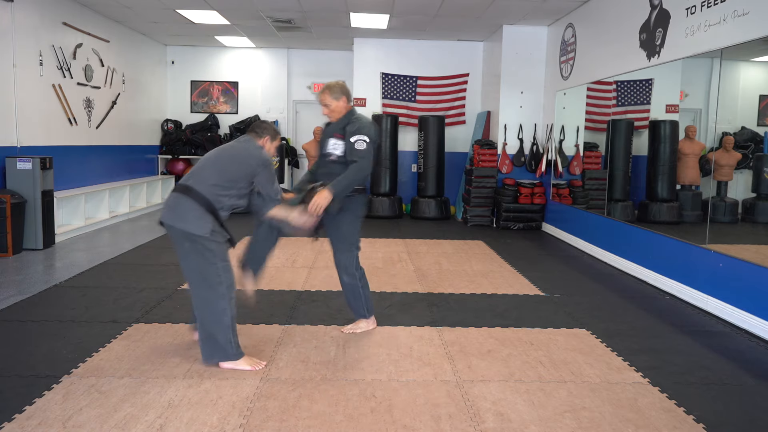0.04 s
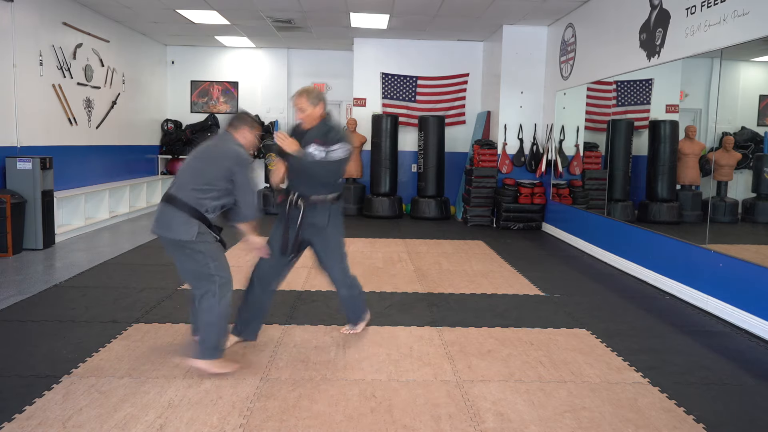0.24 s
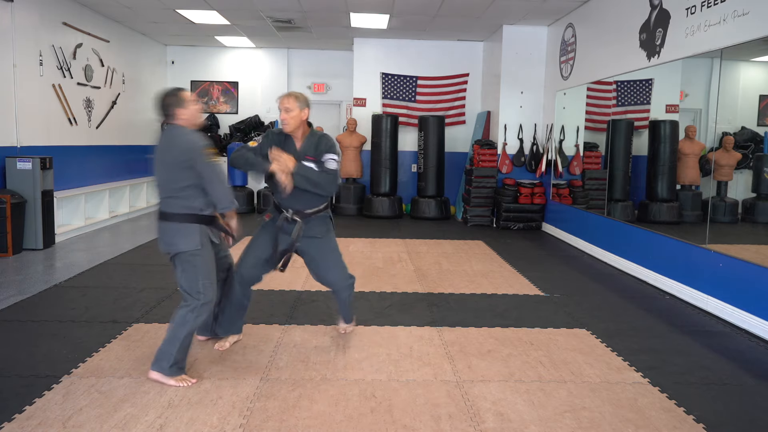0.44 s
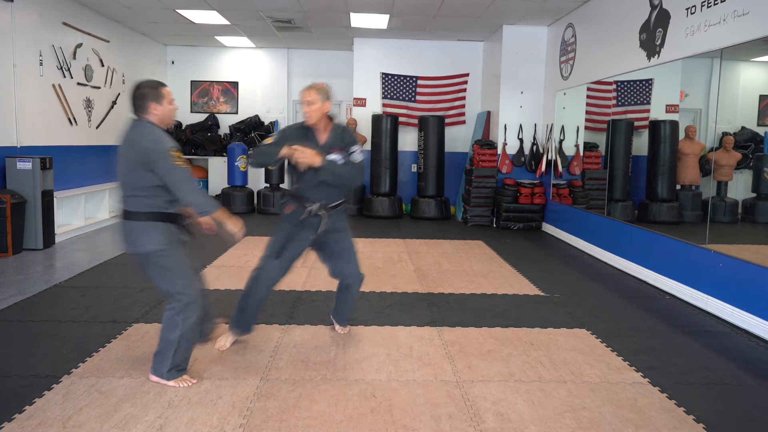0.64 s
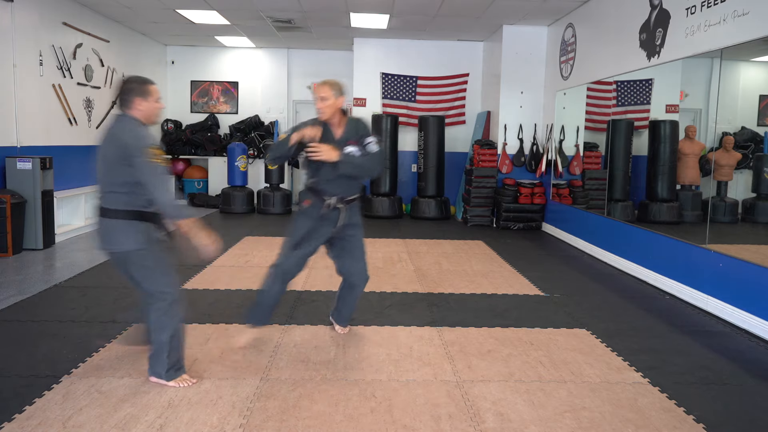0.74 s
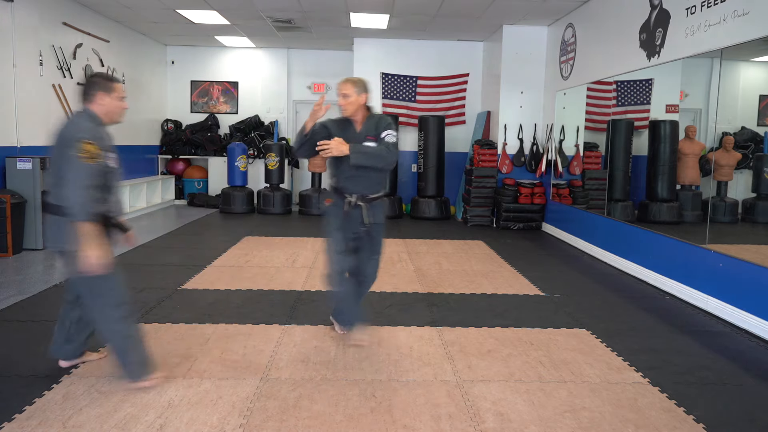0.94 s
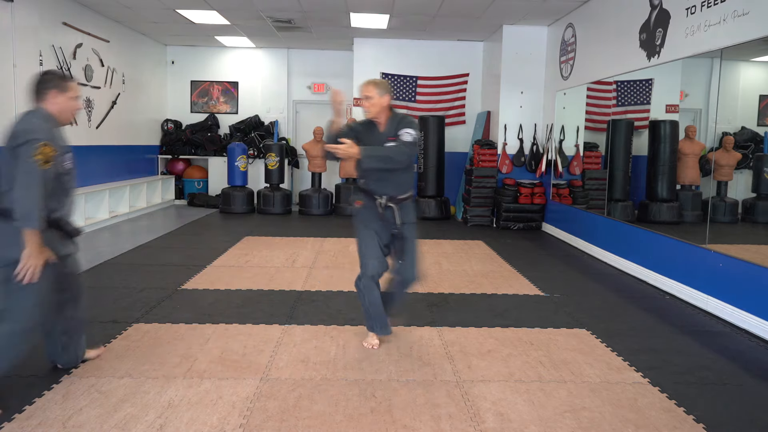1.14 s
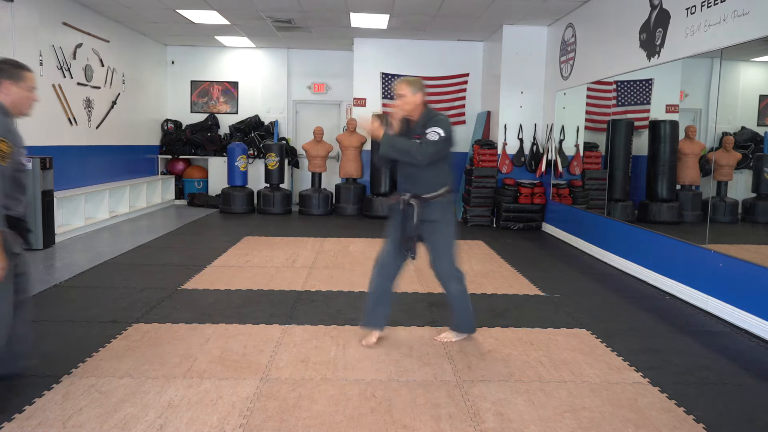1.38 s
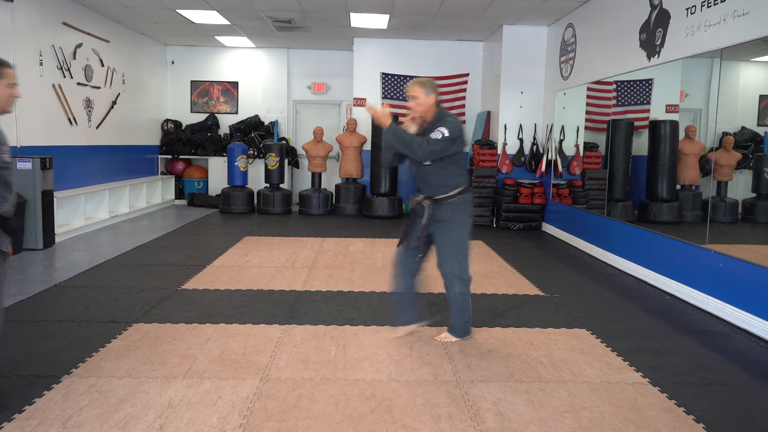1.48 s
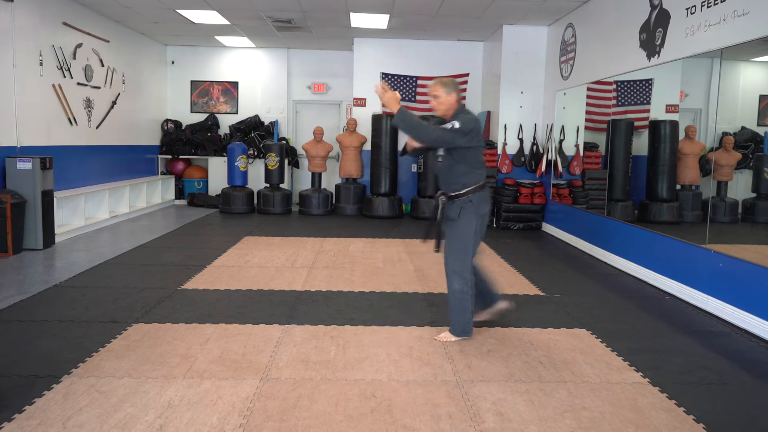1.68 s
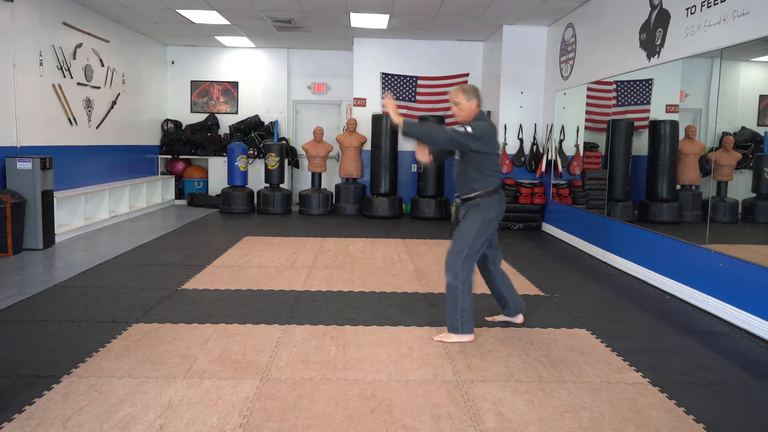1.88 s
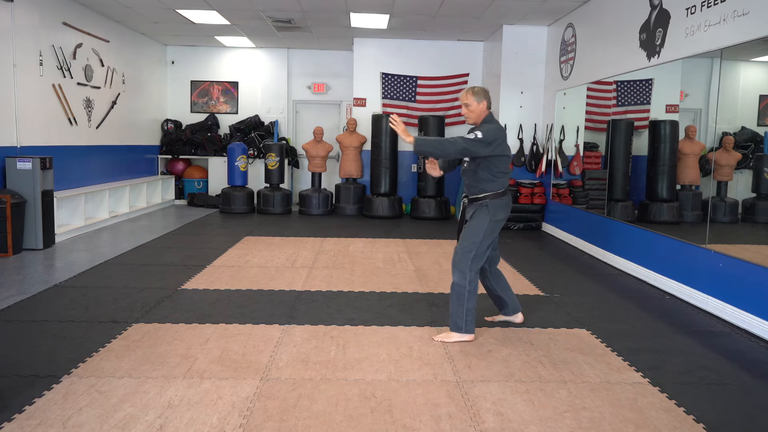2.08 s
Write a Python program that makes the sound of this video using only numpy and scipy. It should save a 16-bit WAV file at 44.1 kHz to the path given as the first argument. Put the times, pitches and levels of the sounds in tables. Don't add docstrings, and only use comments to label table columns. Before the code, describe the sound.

Sparring slaps and uniform snaps on a foam mat. Soft cloth rustle opens; at 0.3-0.4 s a dense flurry of dull body slaps, a low thud and sharp canvas cracks, with lighter contacts to 0.5. A slap and swish come at 0.95, then a bright snap and slaps at 1.13-1.27, left. Light swishes and faint steps follow until about 1.9, over steady ventilation and short hall reflections.

```python
import sys
import numpy as np
from scipy import signal
from scipy.fft import rfft, irfft
from scipy.io import wavfile
from scipy.ndimage import uniform_filter1d, map_coordinates

SR = 44100
rng = np.random.default_rng(int(sys.argv[2]) if len(sys.argv) > 2 else 0)


def decibels_to_gain(level_db):
    exponent = np.asarray(level_db, float) / 20
    return 10 ** exponent


def output_pcm(signal):
    pcm = np.clip(np.atleast_2d(signal).T, -1, 1) * 32767
    wavfile.write(sys.argv[1], SR, np.round(pcm).astype(np.int16))


N = 93536


def rms_one(x):
    return x / np.sqrt(np.mean(x ** 2) + 1e-20)


def at_hz(points, hz):
    curve = np.array(points)
    return np.interp(np.log(hz), np.log(curve[:, 0]), curve[:, 1])


def resonate(x, hz, width_hz):
    r = np.exp(-np.pi * width_hz / SR)
    gain = (1 - r * r) / 2
    return signal.lfilter([gain, 0, -gain], [1, -2 * r * np.cos(2 * np.pi * hz / SR), r * r], x)


def coloured(x, spectrum):
    hz = np.maximum(np.arange(len(x) // 2 + 1) * SR / len(x), 1)
    return rms_one(irfft(rfft(x) * decibels_to_gain(at_hz(spectrum, hz)), len(x)))


def smoothed_noise(size, smooth):
    noise = rng.standard_normal(size)
    return rms_one(uniform_filter1d(uniform_filter1d(noise, size=smooth), size=smooth))


def grains(spread_db, smooth):
    lumps = smoothed_noise(N, smooth)
    return rms_one(rng.standard_normal(N) * decibels_to_gain(spread_db * lumps))


def diffuse(size, shape):
    # hz, side_minus_mid_db
    width_curve = [(60, -64), (250, -19), (500, -10), (1000, -2), (2500, 5), (6000, 0.5), (14000, -2.5)]
    out = 0
    edges = 22 * 2 ** np.arange(0, 9.6, .5)
    white = rng.standard_normal((2, 2, size))
    for k, (low, high) in enumerate(zip(edges, edges[1:])):
        band = signal.butter(2, [low, high], "band", fs=SR, output="sos")
        mid, side = signal.sosfilt(band, white[k % 2])
        hz = np.sqrt(low * high)
        wide = decibels_to_gain(at_hz(width_curve, hz))
        stereo = mid + wide * side * np.array([[1], [-1]])
        out = out + shape(hz) * stereo / np.sqrt(1 + wide ** 2)
    return out


def burst(start, length):
    t = np.arange(N) / SR - start
    onset = np.clip(t / (0.034 * length), 0, 1)
    sag = np.clip(t, 0, length) / length * .5
    release = np.clip(t - length, 0, 1) / (.45 * length)
    return onset * np.exp(-sag - release)


def struck(push, shape, db, hz, width_hz):
    first = resonate(push + 1e-18, hz, width_hz)
    body = resonate(first, hz, max(width_hz, hz * .65))
    return decibels_to_gain(db) * body / np.sqrt(np.sum(body ** 2) / np.sum(shape ** 2) + 1e-20)


def ventilation():
    # hz, level_db
    air_curve = [(15, -29), (25, -13.5), (141, -0.5), (317, -9), (1070, -17), (1230, -31), (1440, -23.5),
                 (7710, -26), (16000, -41)]
    # pitch_hz, width_hz, level_db
    fan_tones = [
        (55.7, 9.4, -52),
        (119.9, 32, -47.5),
        (31, 5.1, -58.5),
    ]
    # time_s, level_db
    air_flow = [
        (0, 1.5),
        (.6, -0.5),
        (1.2, 1),
        (1.75, 0),
        (1.9, -1.5),
        (2.12, -1.5),
    ]
    settle = SR
    air = diffuse(N + settle, lambda hz: decibels_to_gain(at_hz(air_curve, hz)))[:, settle:]
    out = decibels_to_gain(-46.5) * rms_one(air)
    for noise, (hz, width_hz, db) in zip(rng.standard_normal((3, N + settle)), fan_tones):
        tone = resonate(resonate(noise, hz, width_hz), hz, width_hz)[settle:]
        power = uniform_filter1d(tone ** 2, size=2000)
        out = out + decibels_to_gain(db) * rms_one(tone / power ** .25)
    return decibels_to_gain(np.interp(np.arange(N) / SR, *np.transpose(air_flow))) * out


def swishes():
    # peak_s, level_db, rise_s, fall_s, lowest_hz
    swish_events = [(0.019, -39, 0.038, 0.04, 1830), (0.113, -36.5, 0.042, 0.04, 2720),
                    (0.28, -40.5, 0.059, 0.065, 4260), (0.43, -44.5, 0.018, 0.11, 4180),
                    (0.636, -48.5, 0.03, 0.019, 2430), (0.83, -37.5, 0.054, 0.089, 6150),
                    (0.94, -29.5, 0.023, 0.011, 4700), (1.06, -43.5, 0.094, 0.046, 5400),
                    (1.20, -48, 0.016, 0.11, 5030), (1.35, -38.5, 0.023, 0.019, 6900),
                    (1.39, -43, 0.034, 0.13, 2650), (1.515, -36, 0.029, 0.053, 5700),
                    (1.581, -31.5, 0.028, 0.023, 5000), (1.67, -37.5, 0.059, 0.063, 6100),
                    (1.81, -43.5, 0.045, 0.011, 5560), (1.899, -38.5, 0.071, 0.02, 3520)]
    # hz, level_db
    cloth_curve = [(1000, 7), (3000, -1.5), (6000, 1.5), (10000, 1.5), (14000, -3), (16000, -6.5)]
    out, t = np.zeros(N), np.arange(N) / SR
    hiss = coloured(grains(.7, smooth=150), cloth_curve)
    for s, db, rise, fall, hz in swish_events:
        bright = signal.sosfilt(signal.butter(3, hz, "high", fs=SR, output="sos"), hiss)
        swell = np.exp(-((t - s) / np.where(t < s, rise, fall)) ** 2)
        out += decibels_to_gain(db) * rms_one(bright + decibels_to_gain(-14.5) * hiss) * swell
    return out


def rings():
    # start_s, level_db, pitch_hz, length_s, width_hz
    ring_events = [(0.133, -42.5, 1475, 0.022, 80), (0.301, -29.5, 331.6, 0.028, 40),
                   (0.331, -25.5, 338.6, 0.048, 40), (0.409, -32, 345, 0.017, 60),
                   (0.433, -28, 455, 0.015, 120), (0.44, -34, 283, .016, 80), (0.483, -37, 345, 0.021, 60),
                   (0.508, -40.5, 321, .016, 60), (0.479, -40, 622, .045, 50),
                   (0.965, -39, 433, 0.015, 120), (1.036, -37.5, 347, 0.021, 70),
                   (1.066, -39, 371, .02, 70), (1.136, -28.5, 740, .014, 151), (1.185, -36, 352, .022, 80),
                   (0.992, -30.5, 484, 0.013, 140), (1.262, -38, 800, .02, 121),
                   (1.28, -40, 417, 0.022, 90), (1.114, -38, 2360, 0.0094, 700),
                   (1.123, -32, 2115, 0.0095, 600)]
    rough, t, out = rng.standard_normal(N), np.arange(N) / SR, 0
    for s, db, hz, length, width_hz in ring_events:
        shape = (t > s) * (t < s + length) * (0.79 + 0.36 * (t - s) / length)
        push = np.sin(2 * np.pi * hz * (t - s)) + .5 * rms_one(resonate(rough, hz, width_hz))
        out = out + struck(push * shape, shape, db, hz, width_hz)
    return out


def thuds():
    # peak_s, level_db, body_hz, half_length_s
    thud_events = [(0.022, -45, 290, 0.047), (0.084, -45, 1450, 0.19), (0.142, -39.5, 770, 0.028),
                   (0.323, -39, 175, 0.017), (0.36, -29, 200, 0.016), (0.47, -42, 155, 0.017),
                   (0.52, -44, 240, 0.0087), (0.77, -50.5, 1340, 0.0057), (0.69, -52, 900, 0.0081),
                   (0.974, -41.5, 396, 0.068), (0.97, -43, 185, 0.044), (1.04, -49, 4500, 0.035),
                   (1.32, -45.5, 316, 0.036), (1.401, -47, 1730, 0.028), (0.972, -42.5, 2960, 0.058),
                   (1.3, -60.5, 2300, 0.041), (1.14, -36, 228, 0.008), (1.51, -45.5, 3540, 0.029),
                   (1.76, -56, 3200, 0.049), (1.275, -43.5, 233, 0.014), (1.6, -48, 3300, 0.043),
                   (0.39, -47.5, 54, 0.037), (2.1, -53.5, 2700, 0.022), (1.148, -25.5, 3940, 0.015),
                   (0.607, -54, 2270, 0.069), (0.792, -54.5, 2900, 0.043), (1.887, -47, 2300, 0.05),
                   (0.2, -47.5, 203, 0.076), (0.45, -43, 590, 0.015), (1.4, -53, 56.7, 0.018)]
    push, t, out = grains(1.7, smooth=100), np.arange(N) / SR, 0
    for s, db, hz, half in thud_events:
        shape = np.exp(-((t - s) / half) ** 2)
        out = out + struck(push * shape, shape, db, hz, hz / 1.04)
    return out


def cracks():
    # start_s, level_db, length_s, highest_hz
    crack_events = [(0.311, -31.5, 0.014, 8000), (0.325, -31.5, 0.017, 11000), (0.337, -31, 0.0067, 12000),
                    (0.344, -29, 0.004, 14000), (0.3493, -23, 0.0055, 12000), (0.3528, -19, 0.0028, 18000),
                    (0.357, -23, 0.0037, 16000), (0.3616, -20.5, 0.002, 15000),
                    (0.3647, -21, 0.0037, 13000), (0.371, -29.5, 0.0064, 8000), (1.1045, -35, 0.001, 7000),
                    (1.1368, -17.5, 0.0022, 20000), (1.2562, -34, 0.001, 17000), (1.134, -23, 0.002, 10000),
                    (1.1421, -23, 0.0032, 8000), (1.1464, -18, 0.0048, 8900), (1.153, -23, 0.007, 9800),
                    (1.16, -30, 0.006, 6950), (1.182, -35.5, 0.004, 6060), (1.204, -32, 0.0036, 7870),
                    (1.329, -41, 0.0038, 14800), (1.456, -38, 0.0014, 5000)]
    # hz, level_db
    canvas_curve = [(700, -7), (1500, 4.5), (3500, 2), (5200, -3), (7000, 1.5), (11000, -4), (14000, -4.5),
                    (16000, -6)]
    fibres, out = grains(0.71, smooth=20), 0
    for s, db, length, hz in crack_events:
        shape = burst(s, length)
        push = shape * fibres
        push[int(s * SR) + 8] += 2.0
        tautness = signal.butter(2, min(hz, SR / 2.2), fs=SR, output="sos")
        push = signal.sosfilt(tautness, push + 1e-18)
        out = out + decibels_to_gain(db) * push * np.sqrt(np.sum(shape ** 2) / np.sum(push ** 2))
    return coloured(out, canvas_curve) * np.sqrt(np.mean(out ** 2))


def slaps():
    # start_s, level_db, body_hz, length_s
    slap_events = [(0.000, -39.5, 810, 0.026), (0.196, -40, 2600, 0.022), (0.2950, -26, 800, 0.003),
                   (0.3012, -19.5, 800, 0.0025), (0.309, -23, 790, 0.0047), (0.316, -23, 825, 0.025),
                   (0.334, -23.5, 613, 0.042), (0.337, -21.5, 1100, 0.0055), (0.345, -20, 1500, 0.0052),
                   (0.354, -27, 1470, 0.012), (0.347, -28, 523, 0.025), (0.3697, -21.5, 770, 0.0073),
                   (0.381, -29, 1070, 0.011), (0.399, -38, 890, 0.0091), (0.404, -28.5, 670, 0.0089),
                   (0.435, -33.5, 640, 0.012), (0.478, -37, 660, 0.013), (0.505, -42.5, 944, 0.012),
                   (0.648, -46.5, 1320, 0.017), (0.9, -38.5, 925, 0.014), (0.916, -42, 755, 0.0069),
                   (0.9473, -28, 1680, 0.0031), (0.952, -21.5, 1420, 0.0024), (0.958, -31, 930, 0.022),
                   (1.041, -38.5, 1090, 0.014), (1.1343, -25.5, 900, 0.008), (1.138, -28, 1450, 0.0096),
                   (1.165, -29, 690, 0.0076), (1.185, -28, 840, 0.0082), (1.199, -28, 1080, 0.0048),
                   (1.209, -32.5, 1180, 0.0035), (1.235, -39, 1000, 0.0031), (1.2552, -32, 1630, 0.003),
                   (1.265, -36.5, 775, 0.02), (1.461, -47.5, 1000, 0.018), (1.552, -48, 1090, 0.019),
                   (1.648, -39.5, 1150, 0.014), (1.922, -48, 960, 0.022)]
    out, lumps = 0, grains(1, smooth=60)
    for s, db, hz, length in slap_events:
        shape = burst(s, length)
        push = lumps * shape
        push[int(s * SR)] += 5.0
        out = out + struck(push, shape, db, hz, hz / 1.82)
    return out


def hall(x):
    # hz, t60_s
    decay_curve = [(100, 0.82), (300, 0.58), (700, 0.33), (2000, 0.55), (5000, 0.39), (12000, 0.29)]
    delay_s, build_s, knee_s, knee_db = .006, .012, .175, -7
    t = np.arange(SR) / SR
    tail = diffuse(SR, lambda hz: decibels_to_gain(-60 * t / at_hz(decay_curve, hz)))
    tail = tail * (1 - np.exp(-np.clip(t - delay_s, 0, 1) / build_s))
    tail = tail * decibels_to_gain(knee_db * np.clip((t - knee_s) / 0.0069, 0, 1))
    tail = tail * decibels_to_gain(4.0 * smoothed_noise(SR, 50))
    tail = tail / np.sqrt(np.sum(tail ** 2) / 2)
    return decibels_to_gain(-5) * signal.fftconvolve(x[None], tail, axes=1)[:, :N]


def ports(x):
    # time_s, place (+1 left to -1 right)
    place_track = [
        (0, 0.26),
        (.3, 0.22),
        (.5, 0.2),
        (.9, 0.53),
        (1.15, 0.81),
        (1.3, 0.77),
        (1.45, -0.5),
        (1.6, 0.36),
        (1.9, -0.5),
        (2.12, 0.91),
    ]
    lag_s, shadow_db = 0.00011, 7.0
    n = np.arange(N)
    place = np.interp(n / SR, *np.transpose(place_track))
    low = signal.sosfilt(signal.butter(1, 900, fs=SR, output="sos"), x)
    heard = []
    for sign in (1, -1):
        shaded = low + (x - low) * decibels_to_gain(sign * place * shadow_db / 2)
        when = n + sign * place * lag_s * SR / 2
        heard.append(map_coordinates(shaded, [when], order=3, mode="nearest"))
    return np.array(heard)


def scene():
    blows = slaps() + thuds() + cracks() + swishes()
    tuned = rings()
    return ports(blows + tuned) + hall(blows + decibels_to_gain(-12) * tuned) + ventilation()


def band_limit(x):
    return signal.sosfilt(signal.butter(12, 16990, fs=SR, output="sos"), x)


def record(dry):
    ceiling, side_cut_hz, cutoff_hz = .75, 230, 15900
    dry = ceiling * np.tanh(dry / ceiling)
    mid = dry.mean(0)
    no_bass = signal.butter(2, side_cut_hz, "high", fs=SR, output="sos")
    side = signal.sosfilt(no_bass, (dry[0] - dry[1]) / 2)
    passed = np.arange(N // 2 + 1) * SR / N < cutoff_hz
    mix = irfft(rfft([mid + side, mid - side]) * passed, N)
    return band_limit(mix)


dry = scene()
out = record(dry)
output_pcm(out)
```